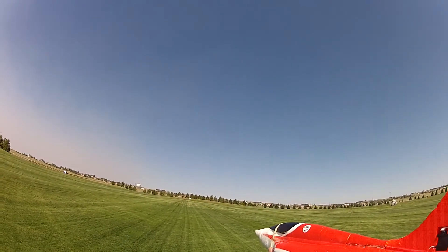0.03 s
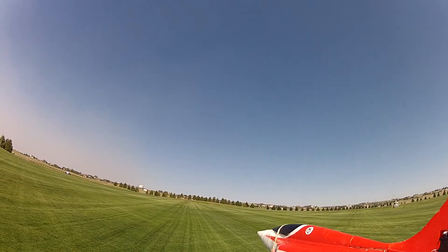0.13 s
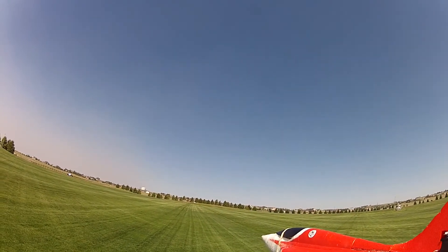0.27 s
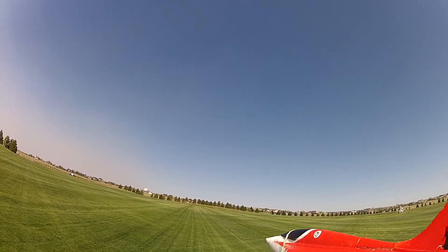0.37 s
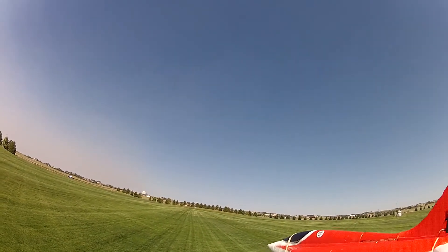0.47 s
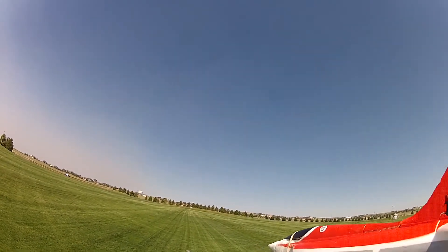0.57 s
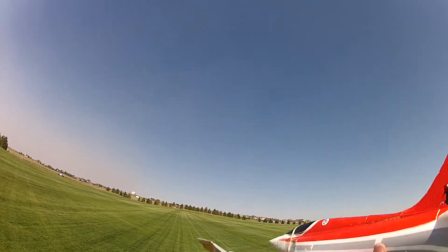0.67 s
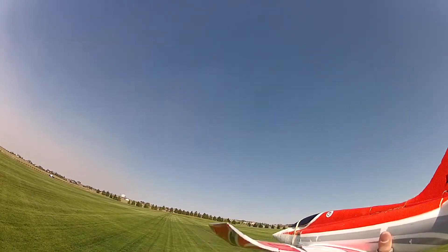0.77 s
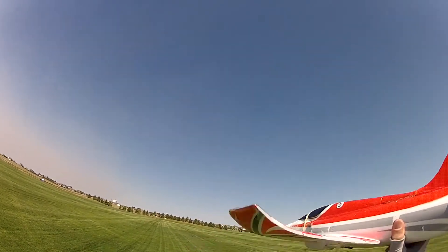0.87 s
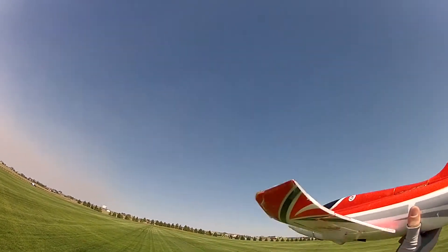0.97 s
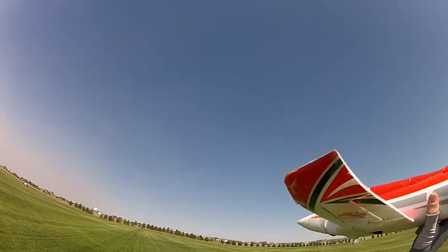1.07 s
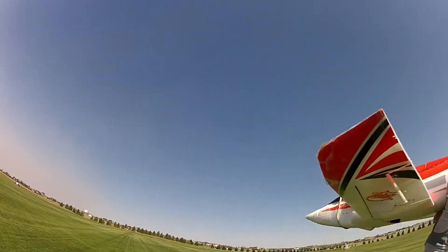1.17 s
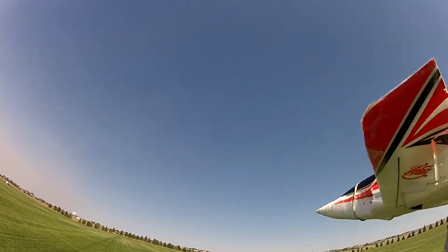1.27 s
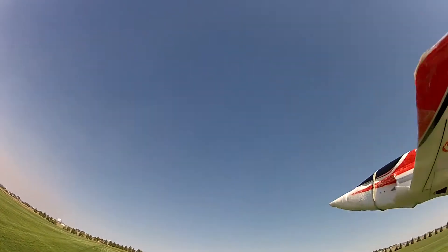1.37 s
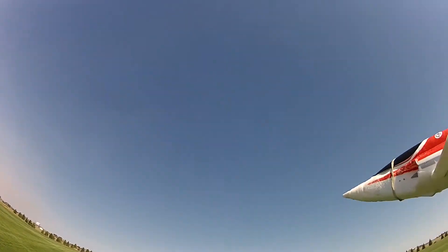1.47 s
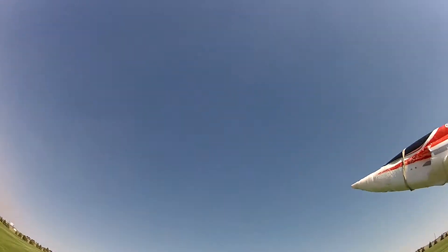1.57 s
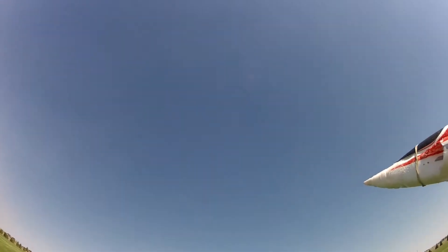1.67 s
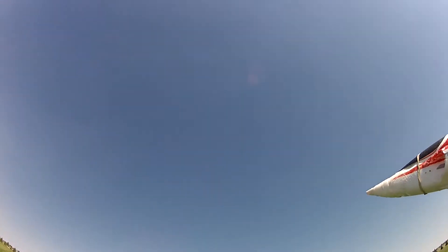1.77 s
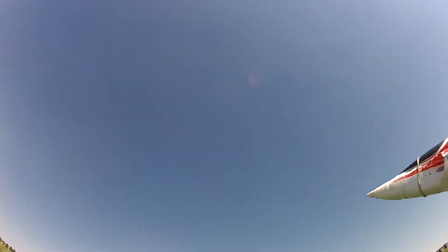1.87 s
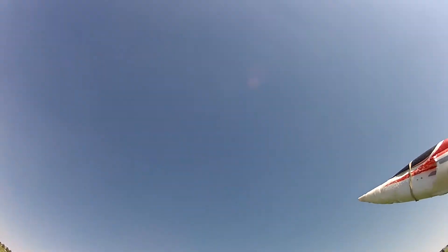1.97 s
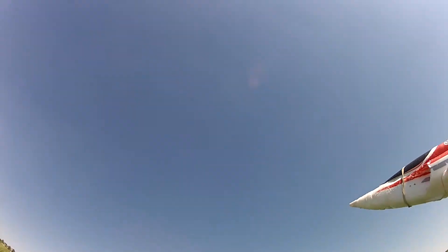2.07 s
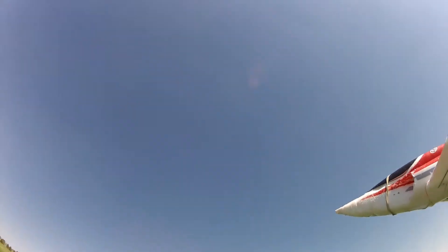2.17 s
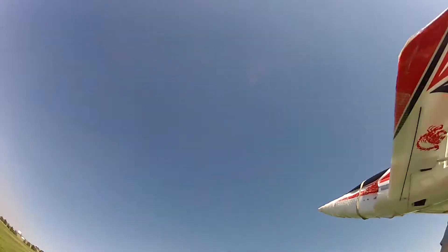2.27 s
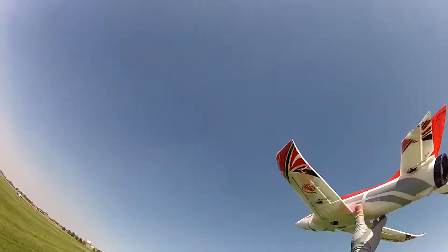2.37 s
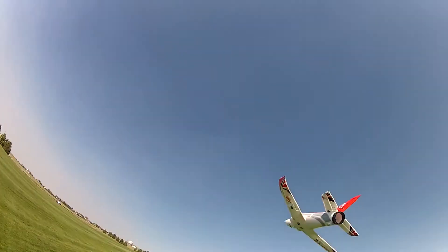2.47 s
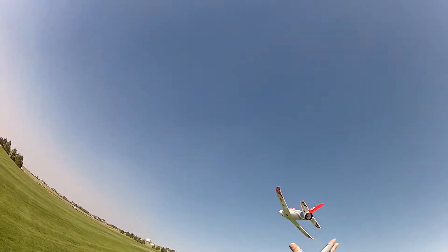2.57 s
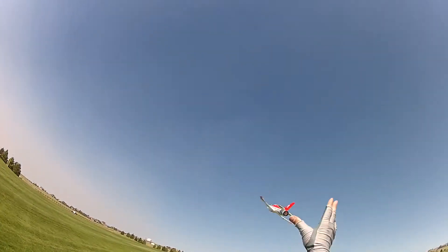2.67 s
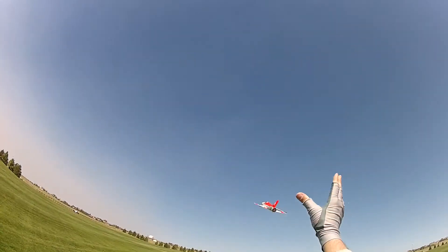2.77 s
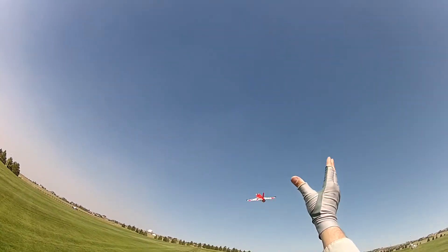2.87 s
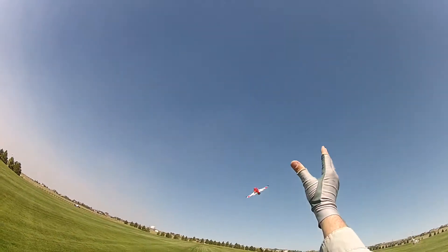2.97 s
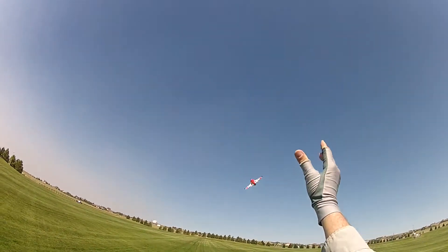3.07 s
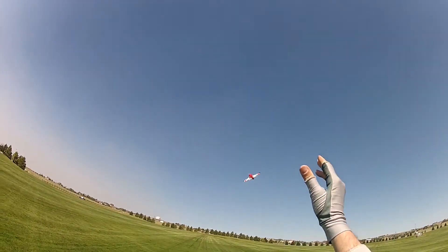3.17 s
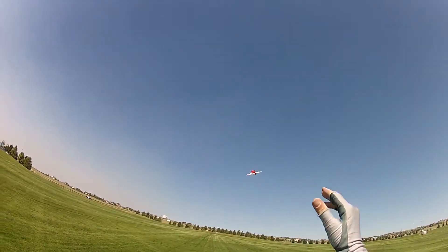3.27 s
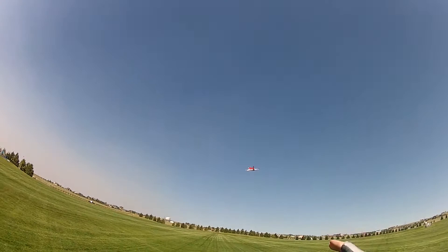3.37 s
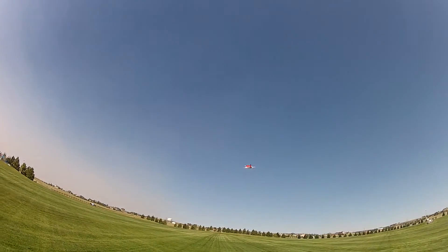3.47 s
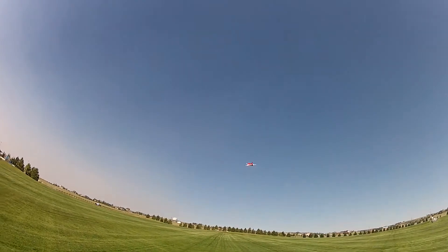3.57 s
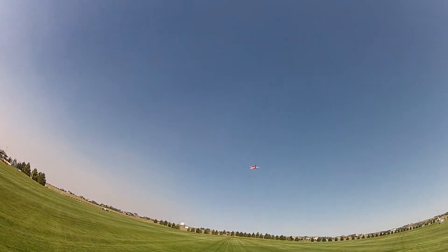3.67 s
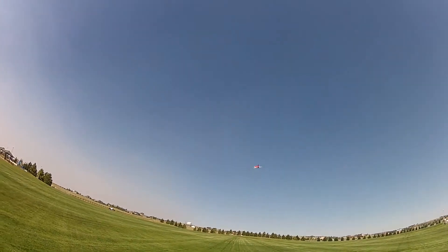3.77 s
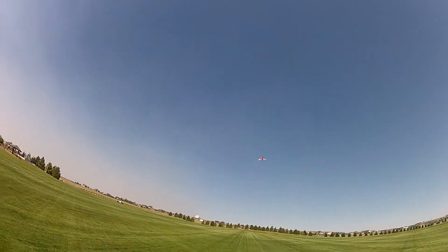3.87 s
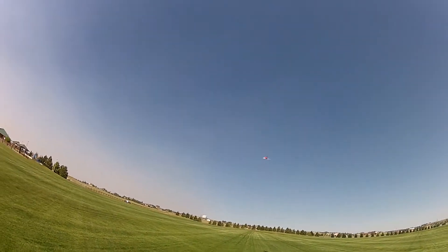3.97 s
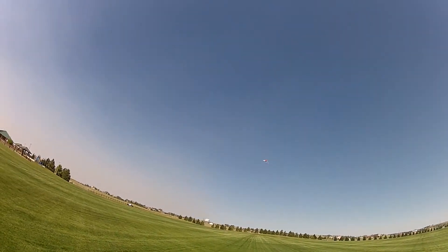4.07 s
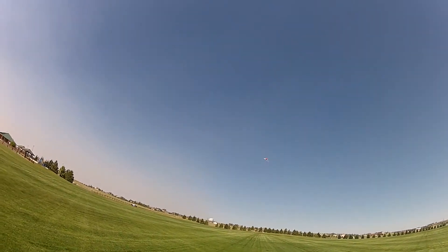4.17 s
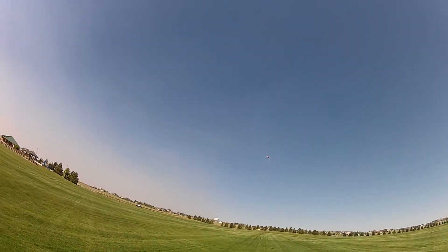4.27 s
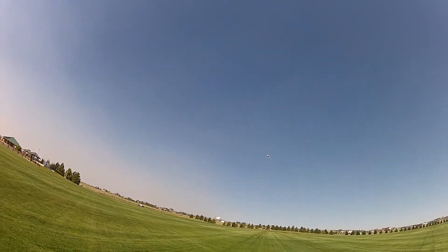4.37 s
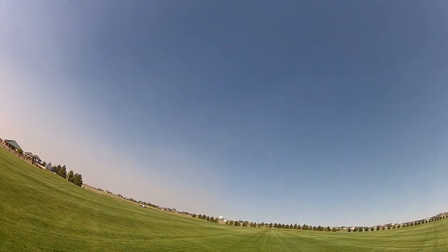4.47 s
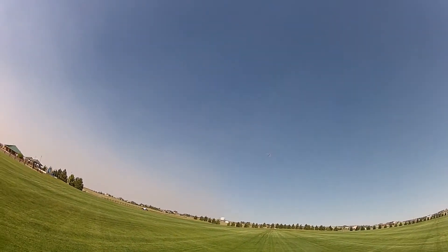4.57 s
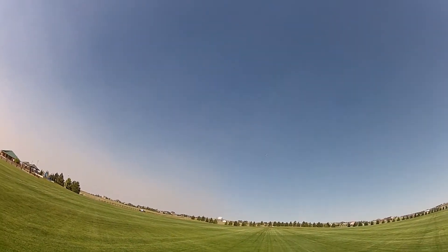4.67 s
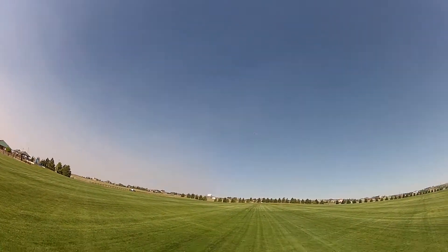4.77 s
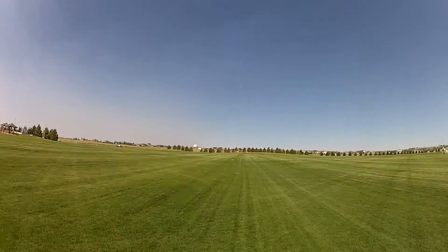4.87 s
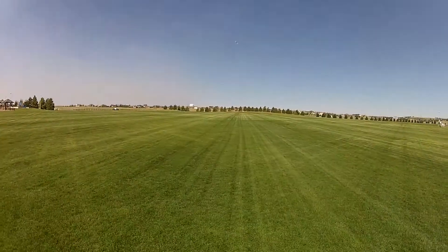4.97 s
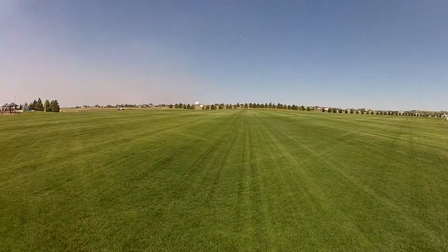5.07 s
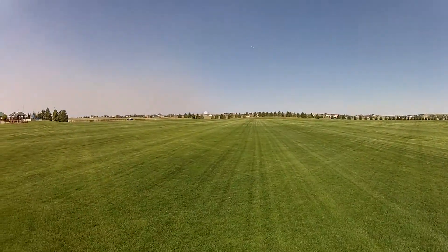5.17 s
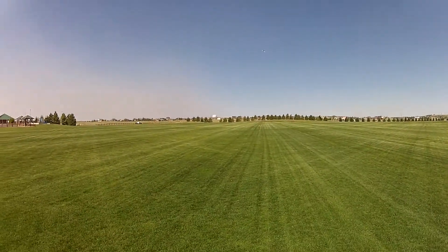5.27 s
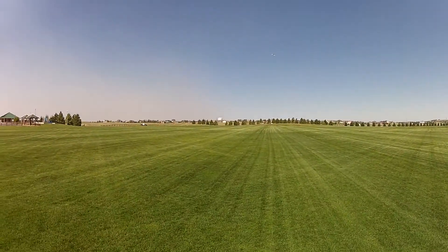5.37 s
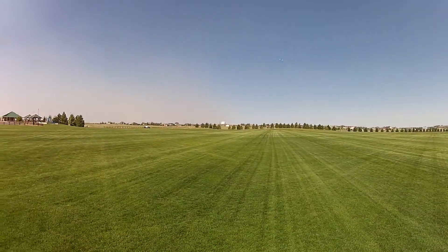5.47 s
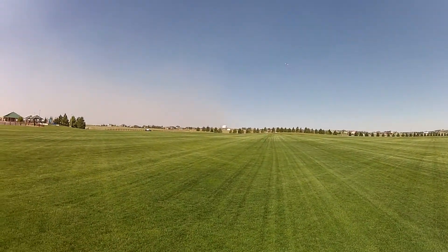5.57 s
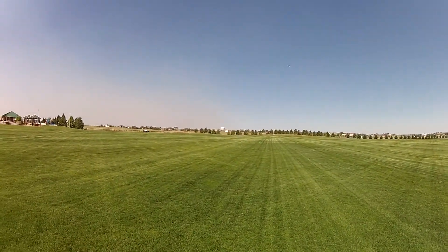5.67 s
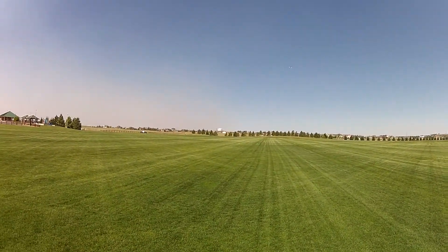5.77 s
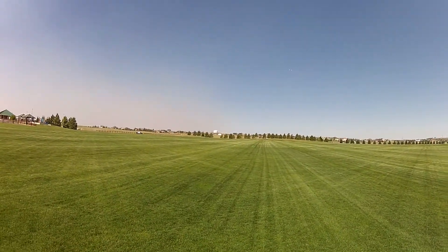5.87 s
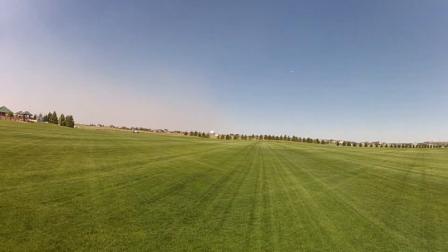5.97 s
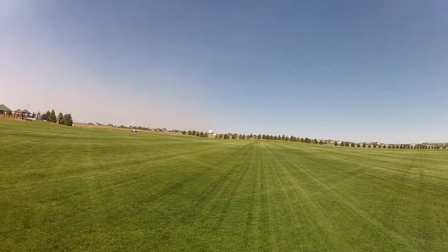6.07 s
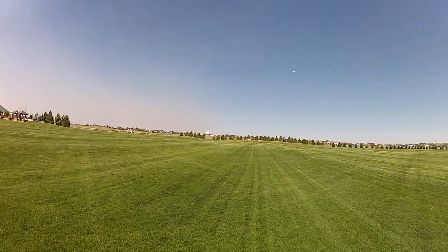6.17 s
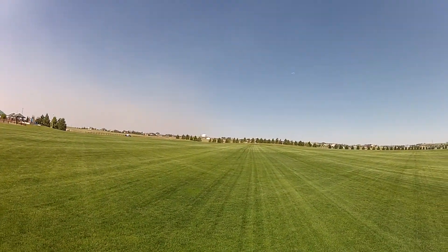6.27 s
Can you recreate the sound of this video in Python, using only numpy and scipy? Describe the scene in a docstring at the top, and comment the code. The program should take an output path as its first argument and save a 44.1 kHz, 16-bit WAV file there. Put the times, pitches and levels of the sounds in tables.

```python
"""Hand launch of a ducted-fan jet

A small electric model is blipped, spools up to a whine in the hand, is lifted overhead and thrown.
Its motor growls at low speed, its fan sings on multiples of the shaft rate and air rushes in its duct.
It flies off over an open field; wind rumbles on a head-worn microphone, hands click on the transmitter.
Coarse sampling gives every whistle a thin mirror image in the treble."""
import sys
import numpy as np
from scipy import signal
from scipy.fft import rfft, irfft, next_fast_len
from scipy.io import wavfile

SR = 44100
rng = np.random.default_rng(int(sys.argv[2]) if len(sys.argv) > 2 else 0)


def persist_wave(psi):
    """Save psi, clipped to +-1, as 16-bit WAV."""
    counts = np.round(np.clip(psi, -1, 1) * 32767).astype(np.int16)
    wavfile.write(sys.argv[1], SR, np.atleast_2d(counts).T)


N = 279064
TIME = np.arange(N) / SR
SAMPLER_HZ = 12000


def from_db(db):
    """Decibels to gain."""
    return 10 ** (np.asarray(db) / 20)


def unit_rms(x):
    """Scale to unit rms."""
    return x / np.sqrt(np.mean(x ** 2) + 1e-20)


def in_time(rows):
    """Each column of a timed curve at every sample."""
    times_s, *columns = np.transpose(rows)
    return [np.interp(TIME, times_s, column) for column in columns]


def bell(x, centre, width):
    """Gaussian swell of height 1."""
    return np.exp(-.5 * ((x - centre) / width) ** 2)


def low_pass(x, hz, order=2):
    """Butterworth low-pass."""
    return signal.sosfilt(signal.butter(order, hz, fs=SR, output="sos"), x + 1e-18)


def noise(spectrum):
    """Unit-rms coloured noise below half the sampler rate."""
    size = next_fast_len(N)
    hz, db = np.transpose(spectrum)
    bins_hz = np.maximum(np.arange(size // 2 + 1) * SR / size, 1)
    gain = from_db(np.interp(np.log(bins_hz), np.log(hz), db)) * (bins_hz < SAMPLER_HZ / 2)
    return unit_rms(irfft(rfft(rng.standard_normal(size)) * gain, size)[:N])


def drift(rate_hz):
    """Unit-rms random wander."""
    return unit_rms(low_pass(rng.standard_normal(N + SR), rate_hz)[SR:])


def ring(clicks, hz, t60_s):
    """Decaying sine, height 1 per unit click."""
    r, w = np.exp(-np.log(1000) / (t60_s * SR)), 2 * np.pi * hz / SR
    return signal.lfilter([0, np.sin(w)], [1, -2 * r * np.cos(w), r * r], clicks + 1e-18)


def resonate(x, hz, width_hz):
    """Resonance with peak gain 1."""
    r, w = np.exp(-np.pi * width_hz / SR), 2 * np.pi * hz / SR
    return signal.lfilter(np.array([1, 0, -1]) * (1 - r * r) / 2, [1, -2 * r * np.cos(w), r * r], x)


def impulse(start_s):
    """One unit click."""
    return 1.0 * (np.arange(N) == round(start_s * SR))


def contact(start_s, hz):
    """Pulse of height 1, softer for lower hz."""
    pulse = low_pass(impulse(start_s), hz, order=4)
    return pulse / pulse.max()


def tone(angle, order):
    """Unit-rms sine on a multiple of the angle."""
    return np.sqrt(2) * np.sin(order * angle + rng.uniform(0, 2 * np.pi))


# Each row: frequency in Hz, relative density in dB.
FIELD_SPECTRUM = [(20, -2.5), (200, 3), (350, -3.5), (650, -10.5), (1100, -17.5), (2200, -17),
                  (3500, -22.5), (4500, -22.5), (5500, -24), (5900, -30.5)]

def field(level_db=-61):
    """Steady hush of the open field."""
    return from_db(level_db) * noise(FIELD_SPECTRUM)


# Each row: time in seconds, level before trim in dB.
BREEZE_LEVELS = [(0, -46.5), (.6, -50.5), (1.05, -47), (1.4, -49.5), (2.1, -45.5), (2.8, -48), (3.4, -51.5),
                 (3.85, -47), (4.55, -54.5), (4.95, -50), (5.4, -58), (6.33, -58)]
# Each row: frequency in Hz, relative density in dB.
BREEZE_SPECTRUM = [(15, -0.5), (30, 0), (60, 3), (85, 0.5), (120, -6.5), (170, -23.5), (250, -20.5),
                   (400, -26), (700, -31.5), (1500, -42.5), (5900, -86)]
# The throw makes the strongest gust. Each row: centre in seconds, width in seconds, boost in dB.
GUST_SWELLS = [(.86, .03, 3), (2.45, 0.047, 11.5), (3.07, 0.025, 5.5), (3.67, .03, 4), (4.02, 0.014, 1),
               (4.33, 0.031, 2.5), (5.59, 0.04, 9.5)]

def wind(trim_db=2.5, lumpy_db=1.3):
    """Breeze and gusts rumble at the microphone port."""
    breeze_db, = in_time(BREEZE_LEVELS)
    gusts_db = sum(db * bell(TIME, centre_s, width_s) for centre_s, width_s, db in GUST_SWELLS)
    return from_db(breeze_db + gusts_db + trim_db + lumpy_db * drift(8.1)) * noise(BREEZE_SPECTRUM)


# Each row: start in seconds, swing drive in dB, frequency in Hz, t60 in seconds, knock peak in dB.
JOLTS = [(0.839, -29, 48, .1, -62), (2.326, -30, 28.2, 0.33, -58), (2.371, -21.5, 22.5, 0.55, -56),
         (2.479, -32, 55, .07, -28), (2.501, -25, 32.8, 0.56, -29), (3.044, -18.5, 41.4, 0.08, -55),
         (3.076, -24.5, 26.97, 0.24, -62), (4.83, -36.5, 114, 0.065, -45), (5.023, -31.5, 36, 0.21, -31.5)]

def thumps(knock_hz=240):
    """Gusts and jolts hit the microphone: a pressure swing and a dull knock."""
    out = np.zeros(N)
    for start_s, swing_db, hz, t60_s, knock_db in JOLTS:
        swing = low_pass(ring(impulse(start_s), hz, t60_s), hz=140)   # pressure builds gradually
        out += from_db(swing_db) * swing - from_db(knock_db) * contact(start_s, knock_hz)
    return out


# Each row: time in seconds, pitch in Hz, level in dB.
WHOOP_GLIDE = [(3.005, 290, -90), (3.022, 250, -50), (3.04, 219, -44), (3.06, 192, -48.5),
               (3.085, 170, -86)]

def whoop():
    """A short low tone falls ahead of one gust."""
    hz, db = in_time(WHOOP_GLIDE)
    sounding = (TIME > WHOOP_GLIDE[0][0]) & (TIME < WHOOP_GLIDE[-1][0])
    return sounding * from_db(db) * tone(2 * np.pi * np.cumsum(hz) / SR, order=1)


# Each row: frequency in Hz, relative density in dB.
GLOVE_SPECTRUM = [(500, -14), (1900, 4), (2600, -10), (3600, -8), (5700, -18)]

def glove_rustle(centre_s=5.1, width_s=.016, level_db=-65):
    """A glove slides briefly on the plastic case."""
    return from_db(level_db) * bell(TIME, centre_s, width_s) * noise(GLOVE_SPECTRUM) * drift(400)


# Each row: start in seconds, contact peak in dB, cutoff in Hz, ringing share.
HAND_CLICKS = [(2.796, -34, 4000, 0.77), (4.036, -37, 4450, 1.04), (4.866, -49, 5500, .3),
               (4.872, -48, 5500, .2), (4.979, -38.5, 3420, 0.89), (5.026, -38.5, 5550, 0.26),
               (5.112, -45, 3500, 0.52), (5.207, -37, 2550, .05), (5.283, -48, 5500, .2),
               (5.585, -44, 5000, .2), (5.599, -43, 5000, .1)]
# Each row: frequency in Hz, gain in dB, t60 in seconds.
CASE_MODES = [(690, -10, 0.025), (910, -17.5, 0.062), (1494, -8.5, 0.019), (2105, -9, 0.023),
              (3000, -14, 0.022), (3500, -10.5, 0.018), (4730, -25, 0.013)]

def transmitter_clicks():
    """Sharp contacts that also ring the plastic case."""
    direct, blows = np.zeros(N), np.zeros(N)
    for start_s, db, cutoff_hz, share in HAND_CLICKS:
        pulse = contact(start_s, cutoff_hz)
        direct += from_db(db) * pulse
        blows += from_db(db) * share * pulse / pulse.sum()
    return direct + sum((-1) ** k * from_db(db) * ring(blows, hz, t60_s)
                        for k, (hz, db, t60_s) in enumerate(CASE_MODES))


# A blip, then full power. Each row: start in seconds, shaft rate gained in Hz, settling in seconds.
THROTTLE_STEPS = [(.035, 150, .42), (.263, 520, .335)]

def rotor_speed(idle_hz=15, sag_hz=13.7, sag_from_s=.78, sag_time_s=1.2):
    """Shaft rate in Hz: it eases up at each throttle step, then the battery sags under load."""
    gained_hz = sum(hz * (1 - (1 - np.clip((TIME - start_s) / settle_s, 0, 1)) ** 3)
                    for start_s, hz, settle_s in THROTTLE_STEPS)
    sag = 1 - np.exp(-np.maximum(TIME - sag_from_s, 0) / sag_time_s)
    return idle_hz + gained_hz - sag_hz * sag


# Each row: time in seconds, receding speed in m/s.
FLIGHT_SPEEDS = [(2.38, 0), (2.45, 1.9), (2.5, 5), (2.6, 7.3), (2.8, 8.8), (3.2, 10.4), (4, 10.6),
                 (5.3, 14.2), (6.33, 16.2)]

def flight(held_at_m=1.08, sound_m_per_s=343):
    """Doppler ratio and spreading gain in dB as the jet flies off."""
    away_m_per_s, = in_time(FLIGHT_SPEEDS)
    distance_m = held_at_m + np.cumsum(away_m_per_s) / SR
    return sound_m_per_s / (sound_m_per_s + away_m_per_s), 20 * np.log10(held_at_m / distance_m)


# Side facing the listener. Each row: time in seconds, aspect (0 nose, 1 abeam, 2 overhead, 3 astern).
ASPECT_PATH = [(.58, 0.57), (.73, 0.95), (1.12, 1.046), (1.27, 1.493), (1.55, 1.77), (1.68, 2.01),
               (2.4, 1.965), (2.5, 2.264), (2.63, 2.66), (2.82, 2.813), (3.06, 2.94)]
# In the hand at top speed. Each row: aspect, then shaft tone, third order, blade tone and rush in dB.
BEAM_PATTERN = [(.5, -48.5, -44, -36, -40.5), (1, -41, -49.5, -37, -42.5),
                (1.5, -40.5, -32.5, -52.5, -44.5), (1.8, -31, -28.5, -49, -44.5),
                (2, -33.5, -31.5, -50, -44.5), (2.3, -34.5, -34.5, -37.5, -41),
                (2.7, -44.5, -43.5, -31, -41), (3, -62, -50.5, -37, -45)]

def directivity():
    """The fan beams each sound its own way: the aspect, then the four levels it selects."""
    aspect, = in_time(ASPECT_PATH)
    sides, *columns_db = np.transpose(BEAM_PATTERN)
    return aspect, [np.interp(aspect, sides, db) for db in columns_db]


# Each row: order, shaft rate in Hz where it flares, width in Hz, peak level in dB. Orders 1-4 flare at a
# critical speed; the blade tone (order 5) flares as it crosses the airframe resonance near 2.2 kHz.
SPEED_FLARES = [(1, 453, 73.6, -43), (2, 473, 63, -47), (3, 434, 86, -54), (4, 470, 56, -53),
                (5, 440, 11, -36)]

def rotor_shake(angle, shaft_hz):
    """Orders 1-4 flare as the rotor passes a critical speed; the blade tone flares as it sweeps through an
    airframe resonance."""
    return sum(from_db(db) * bell(shaft_hz, hz, width_hz) * tone(angle, order)
               for order, hz, width_hz, db in SPEED_FLARES)


# Each row: centre in seconds, width in seconds, drive in dB, roughness 0-1, half-order share.
MOTOR_SURGES = [(.02, .035, -62, 0.6, .5), (.072, 0.011, -52.5, .3, .5), (.125, 0.01, -59.5, .2, 1.2),
                (.17, 0.023, -54, 0.3, .5), (0.278, 0.0028, -51, 0.9, .15), (.294, 0.0093, -53, 1, .15)]
# Each row: frequency in Hz, width in Hz, gain in dB.
AIRFRAME_MODES = [(895, 47, 6), (2136, 125, 13)]

def motor_growl(angle, commutations=18, rattle_db=-3, direct_db=-3):
    """Commutation sweeps up through the airframe resonances and rattles them when uneven."""
    centre_s, width_s, drive_db, roughness, half_share = np.transpose(MOTOR_SURGES)[:, :, None]
    surges = from_db(drive_db) * bell(TIME, centre_s, width_s)
    level = surges.sum(axis=0) + 1e-12
    rough, half = [(surges * column).sum(axis=0) / level for column in (roughness, half_share)]
    stumble = rough * drift(170) / commutations
    cogging = tone(angle + stumble, commutations) + half * tone(angle, commutations / 2)
    rattle = from_db(rattle_db) * rough * drift(2800)
    airframe = sum(from_db(db) * resonate(cogging + rattle, hz, width_hz)
                   for hz, width_hz, db in AIRFRAME_MODES)
    return level * (from_db(direct_db) * cogging + airframe)


# Each row: frequency in Hz, relative density in dB.
IDLE_SPECTRUM = [(300, -24), (680, -29), (900, -1), (1400, -21), (1850, -17), (2180, -1.5), (2450, -31),
                 (2850, -29), (4700, -30), (5700, -39)]

def idle_air(shaft_hz, start_db=-54.5, fall_db_per_s=16.5, until_hz=523):
    """Air stirred by the slow fan."""
    return from_db(start_db - fall_db_per_s * TIME) * (shaft_hz < until_hz) * noise(IDLE_SPECTRUM)


# Each row: frequency in Hz, relative density in dB.
EXHAUST_SPECTRUM = [(200, -7), (500, -7), (900, -10), (1250, -19), (1550, -41), (1830, -39), (2150, 3),
                    (2430, -19), (2780, -36), (3100, 3), (3480, 7.5), (3900, -2), (4400, -11), (5700, -18)]
# Each row: frequency in Hz, width in Hz, gain in dB.
TAILPIPE_MODES = [(2130, 90, 2), (3440, 39, -4.5), (3840, 62, -1), (3750, 70, -5)]

def exhaust_air():
    """Turbulence rings the tailpipe, heard from astern."""
    air = noise(EXHAUST_SPECTRUM)
    ringing = sum(from_db(db) * resonate(air, hz, width_hz) for hz, width_hz, db in TAILPIPE_MODES)
    return unit_rms(air + ringing)


# Rush from two sides. Each row: frequency in Hz, relative density in dB.
ABEAM_SPECTRUM = [(200, -29), (520, -4.5), (720, -7), (880, -3.5), (1130, -7), (1340, -18), (1630, -5),
                  (1880, -5), (2150, 1.5), (2780, -17), (3550, -8.5), (4600, -11), (4880, -13.5),
                  (5700, -23.5)]
OVERHEAD_SPECTRUM = [(200, -14.5), (470, -7.5), (1080, -8), (1310, -17), (1630, -4), (1880, -7), (2110, 4),
                     (2530, -19), (2880, -10), (3550, -9), (4550, -16.5), (4800, -14.5), (5050, -16.5),
                     (5700, -27.5)]
# Each row: frequency in Hz, width in Hz, boost or cut in dB.
INTAKE_BANDS = [(900, 31, 1), (1330, 54, -10), (1620, 210, 1), (2720, 94, -8), (2840, 135, 6),
                (3560, 92, 4), (4550, 180, 4), (4790, 120, -7)]

def intake_air(aspect):
    """Turbulence coloured by the facing side and by the peaks and notches of the intake."""
    overhead = np.clip((aspect - 1) / .92, 0, 1)
    air = np.sqrt(1 - overhead) * noise(ABEAM_SPECTRUM) + np.sqrt(overhead) * noise(OVERHEAD_SPECTRUM)
    for hz, width_hz, db in INTAKE_BANDS:
        air = air + (from_db(db) - 1) * resonate(air, hz, width_hz)
    return unit_rms(air)


def jet_rush(angle, shaft_hz, aspect, rush_db, chop=.16, gusty_db=.9, exhaust_share=.71):
    """Duct turbulence, chopped once a turn; the exhaust dominates from astern."""
    behind = exhaust_share * np.clip(2 * (aspect - 2.14), 0, 1)
    blend = np.sqrt(behind) * exhaust_air() + np.sqrt(1 - behind) * intake_air(aspect)
    air = from_db(rush_db) * blend + idle_air(shaft_hz)
    return from_db(gusty_db * drift(18.4)) * air * (1 + chop * np.sin(angle))


# Flutter close by, rms in dB: shaft tone, third order, blade tone.
NEAR_FLUTTER_DB = [0.33, 0.3, 0.8]
# One tone dips or flares as the jet is turned and thrown.
# Each row: centre in seconds, width in seconds, order, change in dB.
TONE_DIPS = [(.57, 0.047, 1, -14), (2.435, 0.027, 1, -6.5), (2.468, 0.0098, 3, -20), (1.3, 0.035, 5, -8),
             (2.02, .035, 5, -5), (2.505, 0.018, 5, 2), (2.555, 0.017, 5, -9)]
# The far tones fade and return. Each row: time in seconds, gain in dB.
FAR_FADING = [(2.85, 0), (3.12, -7), (3.5, -1.5), (4.1, 2), (4.5, 2), (4.9, -5), (5.18, 0.5), (5.3, -3.5),
              (5.55, 3.5), (6.33, 2.5)]

def fan_whine(angle, aspect, tones_db, far_flutter_db=1.12, rasp=.11):
    """Imbalance sings at the shaft rate, the blades on higher orders; uneven air makes them flutter."""
    astern = np.clip(aspect - 2, 0, 1)
    fading_db, = in_time(FAR_FADING)
    out = np.zeros(N)
    for order, db, near_db in zip((1, 3, 5), tones_db, NEAR_FLUTTER_DB):
        flutter_db = (near_db * (1 - astern) + far_flutter_db * astern) * drift(24)
        dips_db = sum(change_db * bell(TIME, centre_s, width_s)
                      for centre_s, width_s, dip_order, change_db in TONE_DIPS if dip_order == order)
        out += from_db(db + fading_db + dips_db + flutter_db) * tone(angle, order)
    return out * (1 + rasp * astern * drift(150))   # from astern they cross the turbulent exhaust


# Each row: order, then dB relative to the rush abeam, tilted, overhead and astern.
OVERTONE_LEVELS = [(2, -21, -18.5, -13, -48), (4, -28.5, -29, -29, -20), (6, -13.5, -18, -23, -17),
                   (7, -19, -21, -26, -21), (8, -27, -31, -18.5, -39.5)]

def fan_overtones(angle, aspect, rush_db, flutter_db=1.0):
    """Weaker rotor orders that follow the level of the rush."""
    out = np.zeros(N)
    for order, *sides_db in OVERTONE_LEVELS:
        db = np.interp(aspect, (1, 1.8, 2, 3), sides_db)
        out += from_db(rush_db + db + flutter_db * drift(4)) * tone(angle, order)
    return out


def jet(wobble=.00035, tone_db_per_octave=54, rush_db_per_octave=11):
    """One rotor drives every layer; the whine grows with speed far faster than the rush."""
    shaft_hz = rotor_speed()
    doppler, distance_db = flight()
    heard_hz = shaft_hz * doppler * (1 + wobble * drift(20.8))
    angle = 2 * np.pi * np.cumsum(heard_hz) / SR
    octaves = np.log2(shaft_hz / shaft_hz.max())
    aspect, (*tones_db, rush_db) = directivity()
    tones_db = np.array(tones_db) + tone_db_per_octave * octaves + distance_db
    rush_db = rush_db + rush_db_per_octave * octaves + distance_db
    fan = fan_whine(angle, aspect, tones_db) + fan_overtones(angle, aspect, rush_db)
    vibration = rotor_shake(angle, shaft_hz) + motor_growl(angle)
    return fan + vibration + jet_rush(angle, shaft_hz, aspect, rush_db)


def scene():
    """The jet, the wind and the pilot's hands on a quiet field, in mono."""
    return (jet() + wind() + thumps() + whoop() + transmitter_clicks() + glove_rustle() + field())[None]


def record(dry, hold=4, cutoff_hz=15220):
    """Coarse sample-and-hold mirrors the sound into the treble; a steep low-pass cuts the top."""
    coarse = signal.resample_poly(dry, SAMPLER_HZ, SR, axis=1)
    held = np.repeat(coarse, hold, axis=1)
    mirrored = signal.resample_poly(held, SR, hold * SAMPLER_HZ, axis=1)[:, :N]
    return signal.sosfilt(signal.ellip(12, .1, 80, cutoff_hz, fs=SR, output="sos"), mirrored)


dry = scene()
out = record(dry)
persist_wave(out)
```